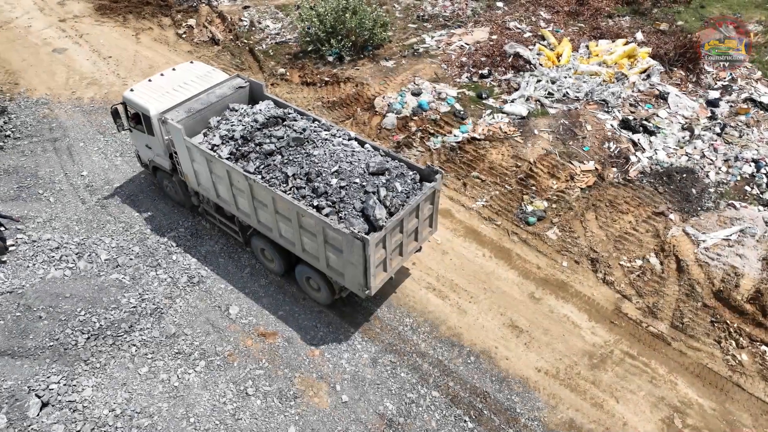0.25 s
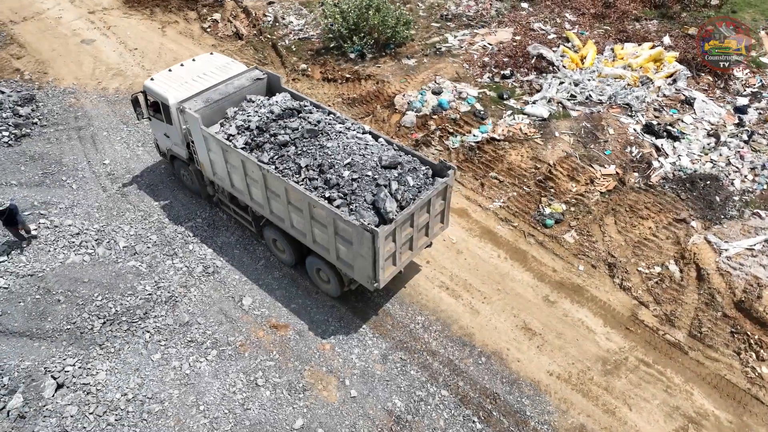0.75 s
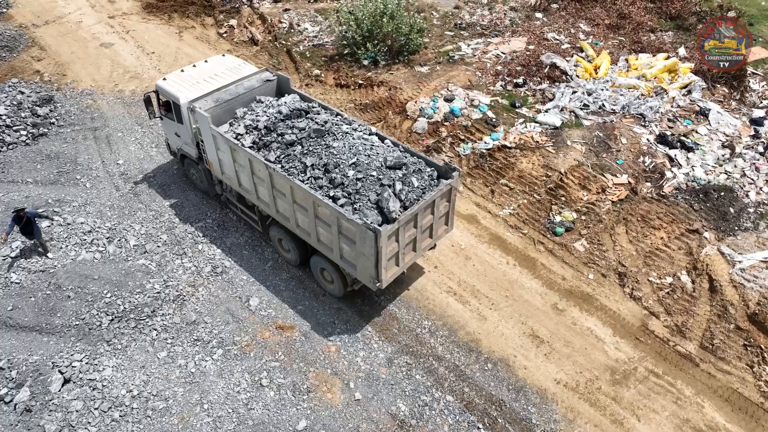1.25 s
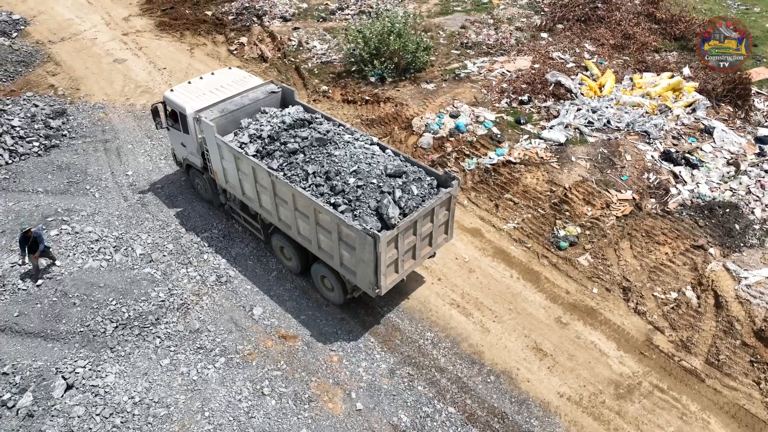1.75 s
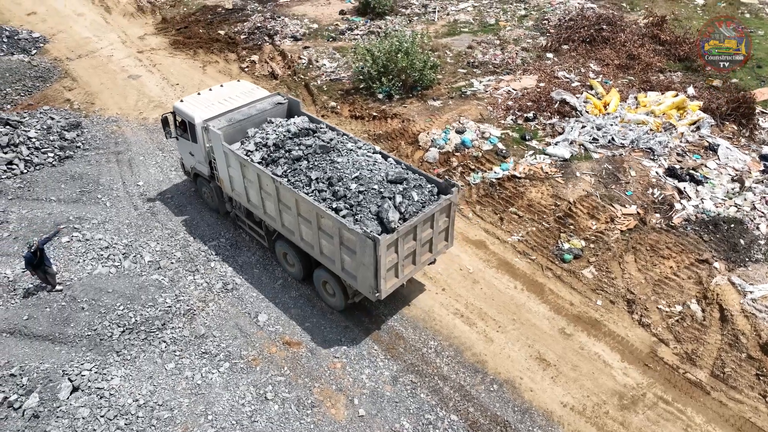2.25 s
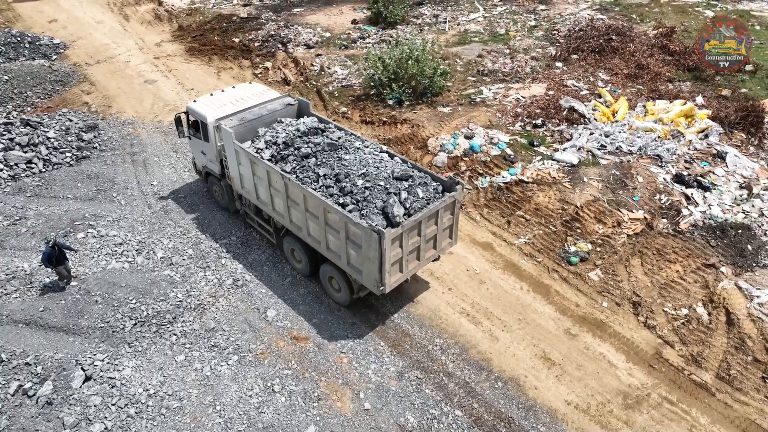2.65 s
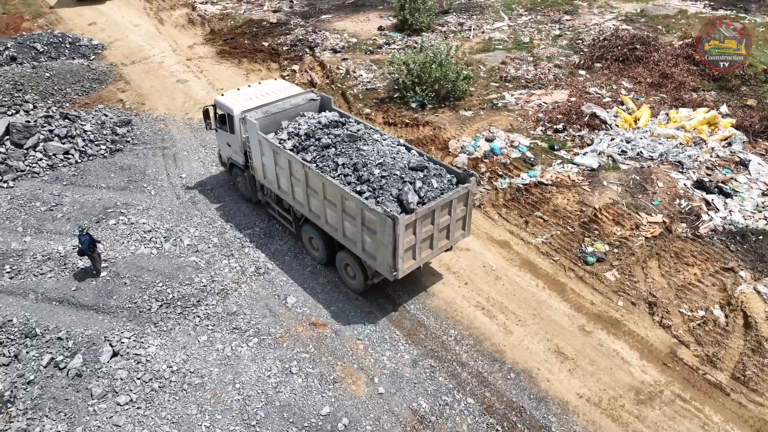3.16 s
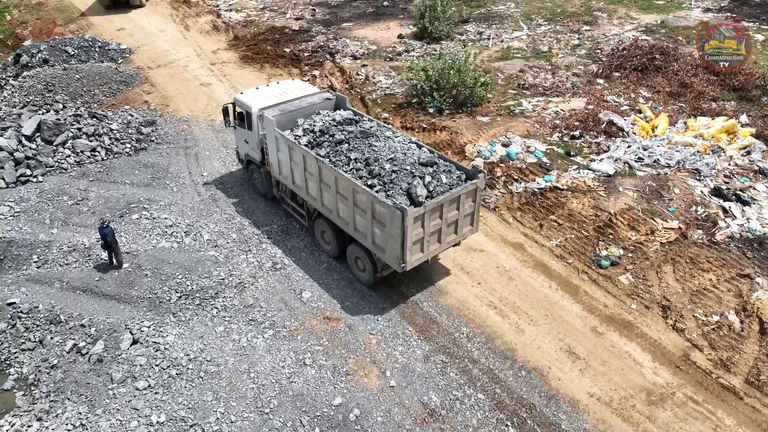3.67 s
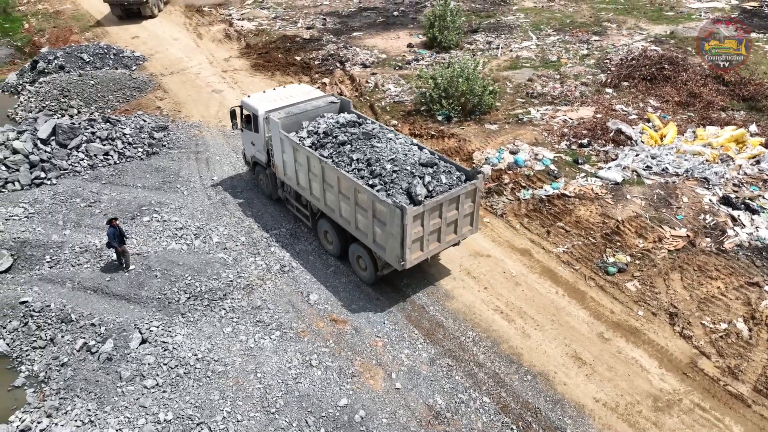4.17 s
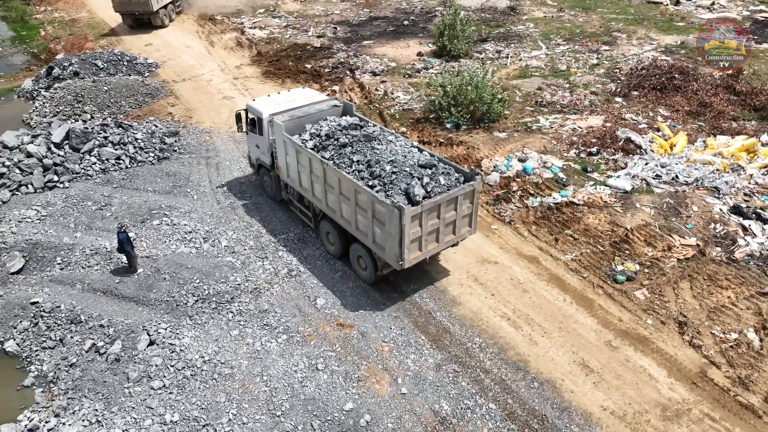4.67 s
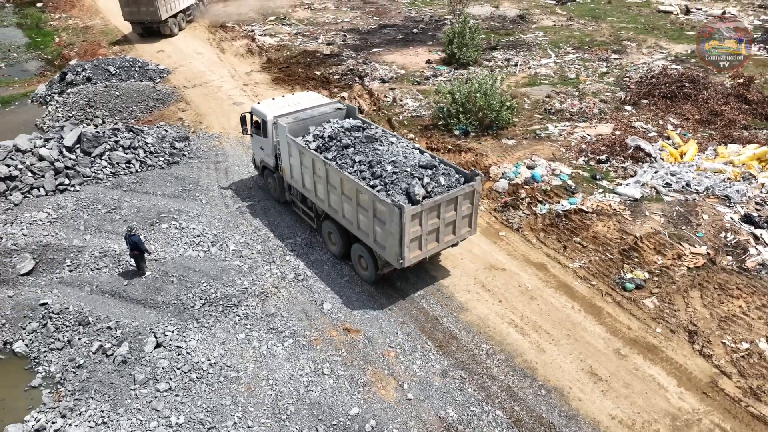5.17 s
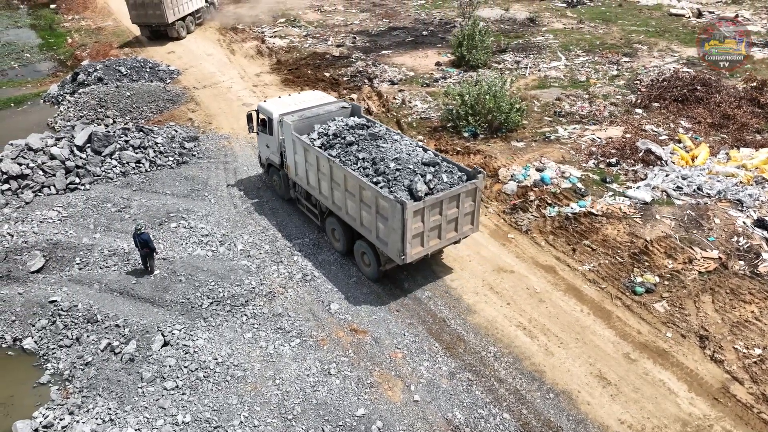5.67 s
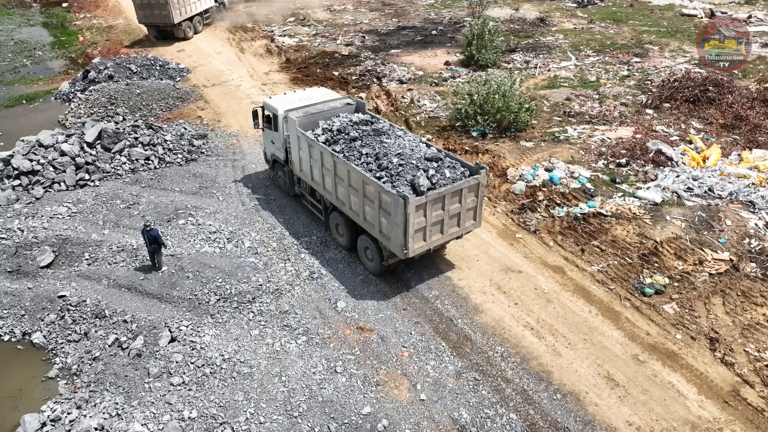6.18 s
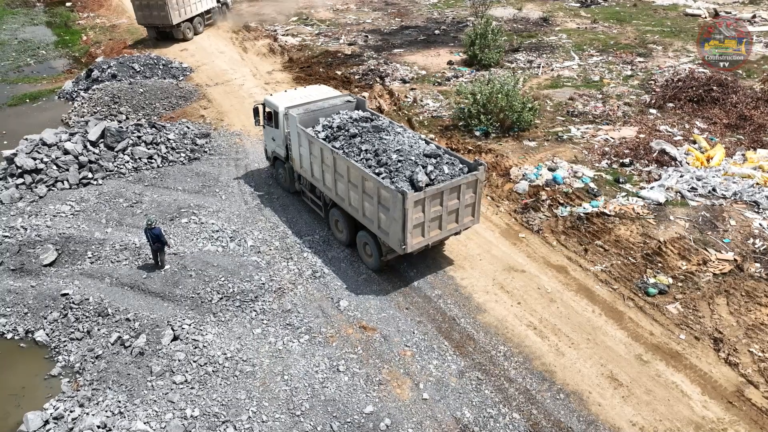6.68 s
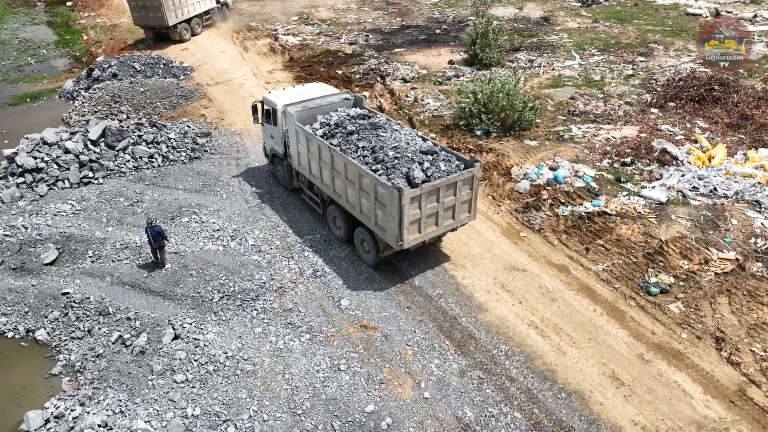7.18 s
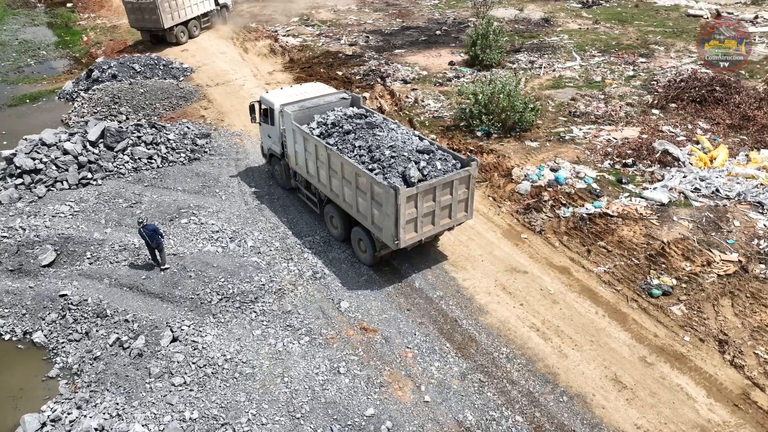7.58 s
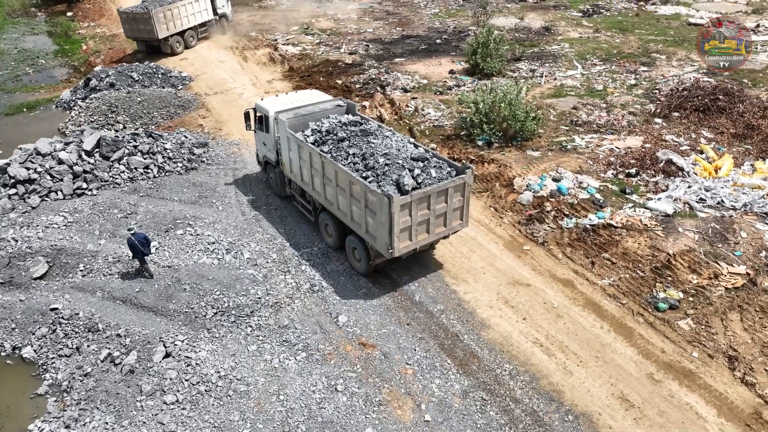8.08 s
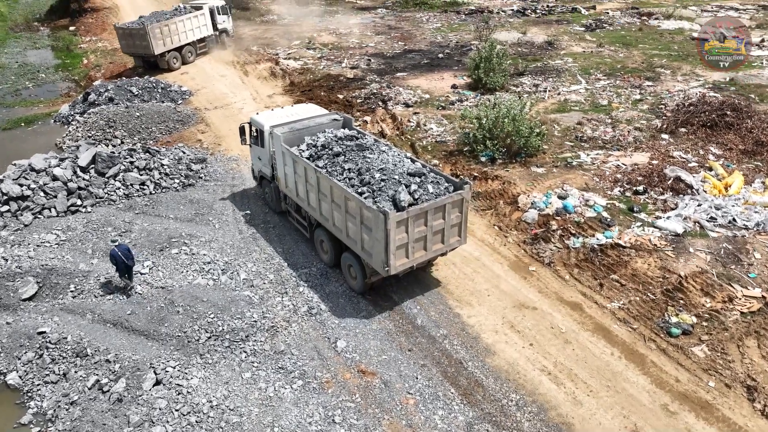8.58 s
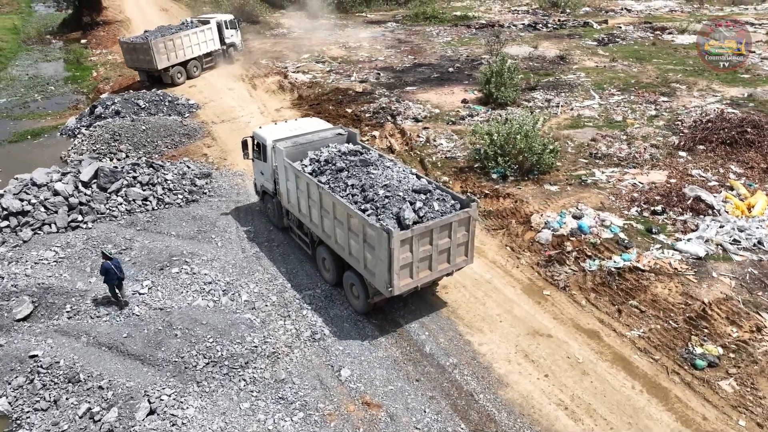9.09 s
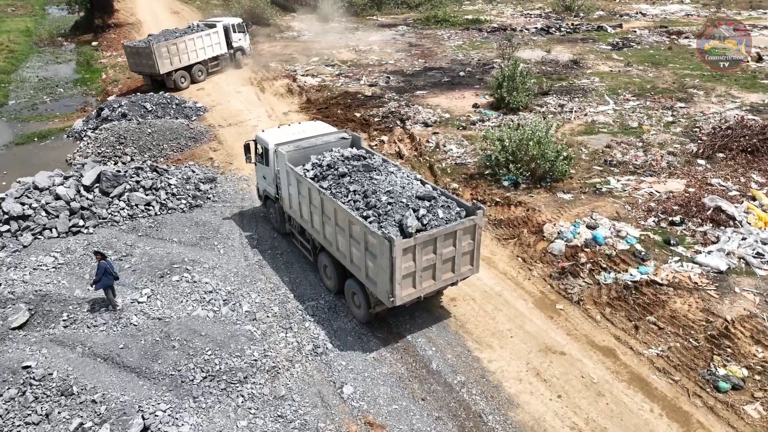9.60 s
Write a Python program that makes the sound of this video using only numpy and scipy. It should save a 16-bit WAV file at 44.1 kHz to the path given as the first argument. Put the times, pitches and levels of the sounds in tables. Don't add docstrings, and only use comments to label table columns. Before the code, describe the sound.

Heavy diesels on an open gravel site, heard through a small, dull, easily overloaded microphone. Three quick soft air-brake puffs come at 0.1 to 0.3 s over low throbbing exhaust, with another, faster engine droning until about 1 s. A loose metal knock lands at 1.1 s as the near engine sags, then it deepens and swells; a tiny falling brake squeal flicks by at 1.8 s. At 2.2 s a hard thump marks an abrupt change. The near engine runs faster but eases, valves clattering, a thin turbo whistle peaking around 3 s and falling away. Near 4.1 s metal knocks and a short air puff sound over low coasting drones, with a fainter knock at 4.6 s. From 4.5 s the engine pulls, pitch climbing until 7.5 s, with whistle, fan tone and drones, then holds a loud roar. A distant idling engine revs up from 8 s; the near note drops slightly at the end.

```python
import sys
import numpy as np
from scipy import signal
from scipy.fft import rfft, irfft, next_fast_len
from scipy.io import wavfile
from scipy.ndimage import uniform_filter1d

SR = 44100
rng = np.random.default_rng(int(sys.argv[2]) if len(sys.argv) > 2 else 0)


def inscribe(sig):
    pcm = np.round(np.clip(np.atleast_2d(sig).T, -1, 1) * 32767)
    wavfile.write(sys.argv[1], SR, pcm.astype(np.int16))


def to_linear_factor(level_db):
    exponent = np.asarray(level_db, float) / 20
    return 10 ** exponent


N = 433944
TIME = np.arange(N) / SR
SPLICE_S = 2.1785


def in_time(rows, fade_s=0.044):
    time_s, *columns = np.transpose(rows)
    gate = np.clip(np.minimum(TIME - time_s[0], time_s[-1] - TIME) / fade_s + 1, 0, 1)
    gate *= (TIME < SPLICE_S) == (time_s[0] < SPLICE_S)
    return [gate] + [np.interp(TIME, time_s, column) for column in columns]


def drift(rate_hz):
    r = np.exp(-80 * np.pi * rate_hz / SR)
    slow = signal.lfilter([1], [1, -2 * r, r * r], rng.standard_normal(N // 40 + 4002))[4000:]
    return np.interp(np.arange(N) / 40, np.arange(len(slow)), slow / slow.std())


def resonance(x, hz, width_hz):
    r = np.exp(-np.pi * width_hz / SR)
    poles = [1, -2 * r * np.cos(2 * np.pi * hz / SR), r * r]
    return signal.lfilter([(1 - r * r) / 2, 0, (r * r - 1) / 2], poles, x)


def bell(hz, centre_hz, width_hz, db):
    return db / (1 + ((hz - centre_hz) / width_hz) ** 2)


def tone(turns, level_db, rough_db):
    phase = 2 * np.pi * (turns + rng.random())
    return np.sqrt(2) * to_linear_factor(level_db + rough_db * drift(25.0)) * np.sin(phase)


def exhaust(rows, orders):
    gate, firing_hz, level_db = in_time(rows)
    turns = np.cumsum(firing_hz) / SR
    out = tone(turns, level_db, rough_db=0.7)
    if orders > 1:
        pipe_db = bell(2 * firing_hz, 71, 11, 23) + bell(2 * firing_hz, 176, 9, 21)
        out += tone(2 * turns, level_db - 22 + pipe_db, rough_db=2.0)
    if orders > 2:
        fan_order = 3.57
        shroud_db = bell(fan_order * firing_hz, 275, 20, 11)
        fan_db = -33 + 16 * np.log2(firing_hz / 80) + shroud_db
        out += tone(fan_order * turns, fan_db, rough_db=3.0)
    return gate * out, gate * np.cos(2 * np.pi * turns)


# time_s, firing_hz, level_db
NEAR_BEFORE = [(0.1, 46, -34), (0.36, 44.5, -22), (0.78, 45.4, -18), (0.92, 43, -19.5), (1.14, 33.8, -24),
               (1.39, 36.2, -18), (1.78, 38, -16), (2.04, 41.9, -11), (2.17, 42.2, -11)]
NEAR_EASING = [(2.23, 60.6, -21), (2.896, 60.6, -18), (3.072, 67.2, -23), (3.568, 76.0, -35),
               (3.67, 74.6, -32), (3.7, 75.1, -45)]
NEAR_PULLING = [(4.35, 46.0, -30), (4.41, 46.3, -33), (4.67, 47.8, -22), (4.95, 50.3, -16),
                (5.59, 62.4, -15), (6.06, 71.4, -22), (6.31, 75.8, -14), (6.46, 78.5, -22),
                (6.89, 85.8, -22), (7.51, 91.0, -18), (9.58, 91.7, -16), (9.84, 86.8, -33)]
FAR_BEFORE = [(0.04, 70.5, -18), (0.452, 74.5, -18), (0.996, 79.7, -22), (1.05, 80.1, -27)]
FAR_AFTER = [(2.9, 36.65, -34.5), (4.471, 36.7, -30), (5.0, 38.73, -24), (5.5, 36.7, -29),
             (7.3, 36.6, -32.5), (8.14, 45.04, -28), (8.499, 53.6, -19.5), (8.85, 58.73, -23.5),
             (9.84, 66.6, -24.5)]


def engines():
    near = [exhaust(NEAR_BEFORE, orders=2), exhaust(NEAR_EASING, orders=2), exhaust(NEAR_PULLING, orders=3)]
    far = [exhaust(FAR_BEFORE, orders=2), exhaust(FAR_AFTER, orders=1)]
    return sum(sound for sound, _ in near + far), sum(beat for _, beat in near)


# low_hz, high_hz
ROAR_BANDS = [(25, 130), (130, 420), (420, 1700), (1700, 4600), (5100, 8500)]
THROB = [0.08, 0.2, 0.13, 0.088, 0.053]


def roar(gate, levels_db, colour_rows, beat):
    on = gate > 0
    size = next_fast_len(on.sum())
    hz = np.arange(size // 2 + 1) * SR / size + 1e-3
    colour_hz, colour_db = np.transpose(colour_rows)
    colour = to_linear_factor(np.interp(np.log(hz), np.log(colour_hz), colour_db)) / np.sqrt(hz)
    shaped = rfft(rng.standard_normal(size)) * colour
    band_rms = [np.sqrt(2 / size * np.sum(colour[(hz > lo) & (hz < hi)] ** 2)) for lo, hi in ROAR_BANDS]
    gains_db = np.array(levels_db)[:, on] - 20 * np.log10(band_rms)[:, None]
    places = np.log2([110, 270, 680, 2800, 5600])
    shared = drift(3.5)[on]
    out = np.zeros(N)
    for octave in np.log2(25) + np.arange(18) / 2:
        window = np.cos(np.pi / 2 * np.clip(2 * (np.log2(hz) - octave), -1, 1)) ** 2
        weights = np.array([np.interp(octave, places, row) for row in np.eye(len(places))])
        flicker_db = 0.21 * shared + 0.88 * drift(8)[on]
        throb = 1 + np.clip(weights @ THROB, 0, 1) * beat[on]
        noise = irfft(shaped * window, size)[:on.sum()]
        out[on] += noise * to_linear_factor(weights @ gains_db + flicker_db) * throb
    return out


def roar_levels(effort, near, far, laws):
    gate, effort_db = in_time(effort)
    near_octaves = np.log2(in_time(near)[1] / 60)
    far_octaves = np.log2(in_time(far)[1] / 60)
    levels_db = [
        base_db + share * (effort_db + 40) + near_db * near_octaves + far_db * far_octaves
        for base_db, share, near_db, far_db in laws
    ]
    return gate, levels_db


# time_s, effort_db
EFFORT_BEFORE = [(0, -45), (.9, -39), (1.27, -38), (1.7, -32.5), (2.17, -29)]
EFFORT_AFTER = [(2.19, -46), (2.75, -45), (3.15, -41), (3.45, -47), (4.1, -49.5), (4.5, -50), (4.8, -44.5),
                (6, -37), (7.1, -32.5), (8.2, -29), (8.85, -25), (9.5, -25), (9.84, -28.5)]
# base_db (effort -40 dB, 60 Hz firing), effort_share,
# near_speed_db_per_octave, far_speed_db_per_octave
ROAR_LAWS = [
    [(-25, 0.12, -2.5, -1.5), (-25.5, 0.49, 0.5, -0.5), (-30, 0.91, -3.5, -0.2), (-40.5, 0.93, 1.9, 2.2),
     (-44, 0.85, 2.5, 1.9)],
    [(-27.5, 0.53, -1.9, 1.8), (-29.5, 0.51, 9, -7.5), (-29.5, 0.69, -0.8, 3.5), (-39.5, 0.85, 1, 2.7),
     (-45, 0.81, 2, -1.5)],
]
# corner_hz, level_db_per_octave
ROAR_COLOUR = [
    [(25, -27.5), (60, -25.5), (130, -25), (400, -31), (600, -34), (720, -31), (900, -33), (1200, -25.5),
     (1650, -28.5), (2000, -23), (2650, -25), (3000, -33.5), (6000, -44), (9000, -48.5)],
    [(25, -47), (50, -26), (130, -25.5), (250, -20.5), (400, -23.5), (450, -26), (800, -29.5),
     (1000, -32.5), (1200, -32), (1500, -33), (2200, -35), (3200, -36.5), (6000, -41.5), (9000, -46)],
]


def machine_roar(beat):
    before = roar_levels(EFFORT_BEFORE, NEAR_BEFORE, FAR_BEFORE, ROAR_LAWS[0])
    after = roar_levels(EFFORT_AFTER, NEAR_EASING + NEAR_PULLING, FAR_AFTER, ROAR_LAWS[1])
    return roar(*before, ROAR_COLOUR[0], beat) + roar(*after, ROAR_COLOUR[1], beat)


def whistle(rows, blur_hz):
    gate, pitch_hz, level_db = in_time(rows)
    angle = 2 * np.pi * np.cumsum(pitch_hz) / SR
    return gate * to_linear_factor(level_db) * (drift(blur_hz) * np.cos(angle) + drift(blur_hz) * np.sin(angle))


# time_s, pitch_hz, level_db
DRONES = [
    [(3.6, 73.5, -40), (3.9, 73.8, -39), (4.2, 74.6, -26.5), (4.55, 73, -38)],
    [(3.35, 151.6, -35), (3.6, 142, -36), (3.9, 129, -35), (4.15, 110.4, -33)],
    [(5.5, 142, -41), (6.1, 170, -35), (6.5, 186, -29.5), (6.9, 201, -18.5), (7.3, 213, -22.5),
     (7.7, 232.3, -17.5), (8, 240.2, -18.5), (8.6, 232, -18.5), (9.3, 240, -26.5), (9.84, 238, -43.5)],
    [(8.9, 215, -28.5), (9.2, 208.4, -18.5), (9.5, 201.3, -27), (9.84, 194, -24)],
]


def drones():
    return sum(whistle(rows, blur_hz=4.85) for rows in DRONES)


# mode_hz, width_hz, level_db
VALVE_MODES = [(1280, 400, 0), (780, 250, -3), (1850, 400, -8)]


def valve_knock(rows, level_db, phase):
    gate, firing_hz, load_db = in_time(rows)
    cycle = np.cumsum(firing_hz * (gate > 0)) / SR / 6 + phase
    first = np.exp(-np.mod(cycle, 1) / 0.22)
    second = to_linear_factor(-4) * np.exp(-np.mod(cycle + 0.3, 1) / 0.1)
    chatter = 0.3
    burst = gate * to_linear_factor(load_db / 2) * (chatter + first + second) * rng.standard_normal(N)
    modes = [to_linear_factor(db) * resonance(resonance(burst, hz, width), hz, width) for hz, width, db in VALVE_MODES]
    return to_linear_factor(level_db) * sum(modes)


# start_s, peak_db, pitch_hz
KNOCKS = [(1.083, -17, 716), (4.128, -21, 850), (4.177, -30, 703), (4.586, -28, 703)]


def knocks():
    out, t = np.zeros(N), TIME[:1500]
    for start_s, peak_db, pitch_hz in KNOCKS:
        noise = rng.standard_normal(1500)
        click = 2 * resonance(resonance(noise, 1300, 1400), 1300, 1400) * np.exp(-t / 0.0025)
        ring = np.sin(2 * np.pi * pitch_hz * t) * np.exp(-t / 0.006)
        start = round(start_s * SR)
        out[start:start + 1500] += to_linear_factor(peak_db - 1) * (0.9 * ring + click)
    return out


# start_s, length_s, level_db
PUFFS = [(0.097, 0.058, -37), (0.203, 0.046, -39.5), (0.306, 0.034, -43.5), (4.24, 0.07, -34.5)]


def puffs():
    shape = np.zeros(N)
    for start_s, length_s, level_db in PUFFS:
        opening = np.clip((TIME - start_s) / 0.028, 0, 1)
        closing = np.exp(-np.clip(TIME - start_s - length_s, 0, 9) / 0.029)
        shape += to_linear_factor(level_db) * opening * closing
    jet = resonance(resonance(rng.standard_normal(N), 5500, 4000), 7600, 4000)
    return shape * jet / jet.std()


# time_s, pitch_hz, level_db
SQUEAL = [(1.815, 8570, -43), (1.84, 8100, -38), (1.865, 6950, -37), (1.89, 6340, -44.5), (1.91, 6170, -50)]


def squeal():
    return whistle(SQUEAL, blur_hz=59)


# time_s, pitch_hz, level_db
TURBO = [
    [(2.2, 5150, -54), (2.85, 5750, -54), (2.99, 5950, -45), (3.15, 6300, -46), (3.3, 6700, -52),
     (3.55, 6450, -52.5), (3.9, 6050, -53), (4.15, 5700, -57)],
    [(4.9, 5100, -56), (5.2, 5500, -49), (5.5, 6250, -47), (5.8, 6950, -50), (6.1, 7750, -50),
     (6.45, 8700, -48), (6.9, 9480, -46), (7.7, 9600, -44), (8.2, 9520, -52)],
]


def turbo():
    return sum(whistle(rows, blur_hz=75) for rows in TURBO)


def scene():
    notes, beat = engines()
    out = notes + machine_roar(beat) + drones()
    out += valve_knock(NEAR_EASING, level_db=-6, phase=0.75)
    out += valve_knock(NEAR_PULLING, level_db=-9, phase=0.2)
    out += knocks() + puffs() + squeal() + turbo()
    return out[None]


# time_s, low_dip_hz, low_dip_db, high_dip_hz, high_dip_db
GROUND_DIPS = [(0, 3110, 3, 3410, 2), (2.17, 3150, 1.5, 3500, 2.5), (2.191, 2980, -5.5, 4100, -7),
               (4.001, 2770, -1.5, 3950, -3), (5.5, 2360, -3.5, 4060, -11), (6.5, 2170, -0.5, 4100, -11),
               (7.5, 2140, -2.5, 4070, -11), (8, 2620, 0.5, 4330, -9), (9.84, 2990, -8, 4100, -4.5)]


def path_colour_and_dropouts(x, masked_db, faint_db):
    hz, frame_s, frames = signal.stft(x, SR, nperseg=2048)
    hz = hz[:, None]
    times_s, *dips = np.transpose(GROUND_DIPS)
    low_hz, low_db, high_hz, high_db = (np.interp(frame_s, times_s, column) for column in dips)
    db = bell(hz, low_hz, 120, low_db) + bell(hz, high_hz, 150, high_db)
    db = db + bell(hz, 4850, 150, -15) + bell(hz, 6440, 800, 5.1)
    db = db + bell(hz, 9550, 150, 15)
    db = db - 23.5 * np.clip(hz - 8277, 0, None) / 1000
    frames = frames * to_linear_factor(db)

    band_hz = hz[:1024:4]
    power = (np.abs(frames[:1024]) ** 2).reshape(256, 4, -1).mean(axis=1) * band_hz
    power = uniform_filter1d(power, size=2, axis=1)
    around = uniform_filter1d(power, size=19, axis=0)
    luck = np.repeat(rng.standard_normal((128, len(frame_s))), 2, axis=0)
    luck_db = 8 * uniform_filter1d(luck, size=3, axis=1)
    thrift_db = 3 + 5 * rng.exponential(1, len(frame_s))
    floor = to_linear_factor(2 * faint_db + thrift_db * np.clip(band_hz / 1000 - 6.5, 0, 9))
    audible = power * to_linear_factor(luck_db) > np.maximum(around * to_linear_factor(2 * masked_db), floor)
    frames[:1024] *= np.repeat(audible | (band_hz < 1800), 4, axis=0)
    return signal.istft(frames, SR)[1][:N]


def top_cut(x):
    return signal.sosfilt(signal.butter(12, 15900, fs=SR, output="sos"), x)


def record(dry):
    soft_top, overload = 1.5, 0.725
    x = path_colour_and_dropouts(soft_top * np.tanh(dry[0] / soft_top), masked_db=-6.5, faint_db=-43)
    step = (TIME >= SPLICE_S) * np.exp(-np.abs(TIME - SPLICE_S) / 0.0027)
    mix = np.clip(x + 0.3 * step, -overload, overload)[None]
    return top_cut(mix)


dry = scene()
out = record(dry)
inscribe(out)
```